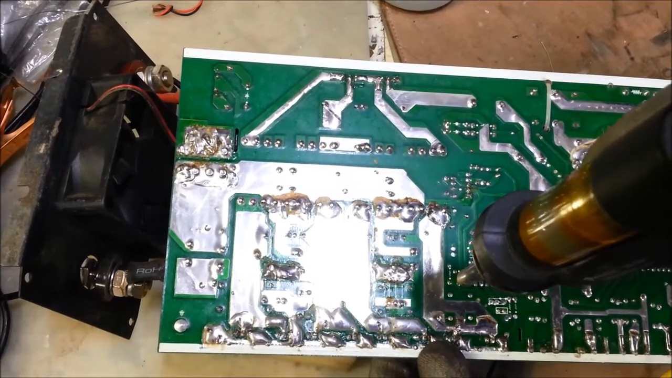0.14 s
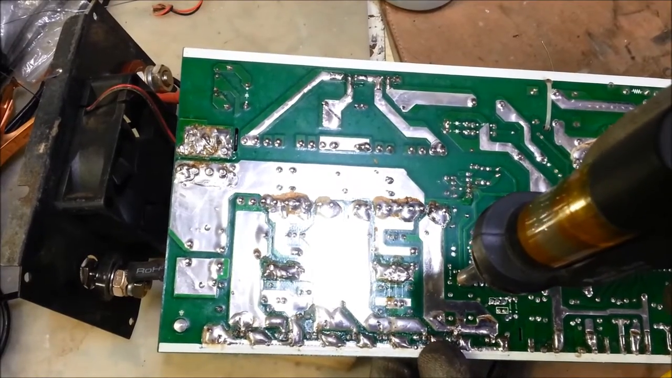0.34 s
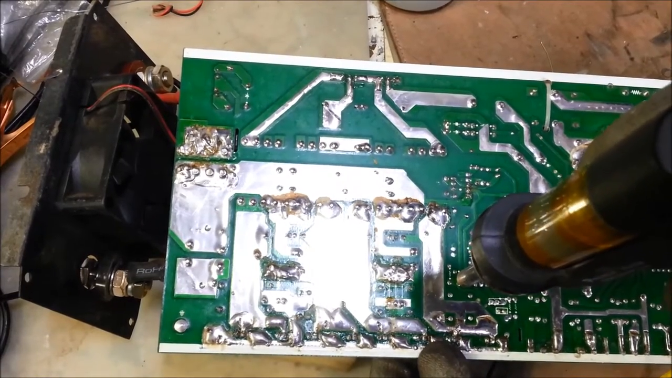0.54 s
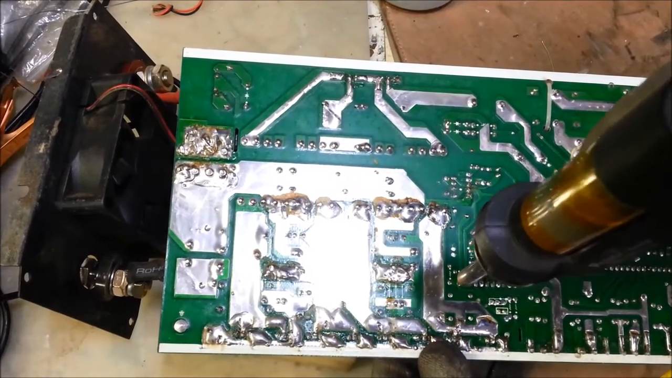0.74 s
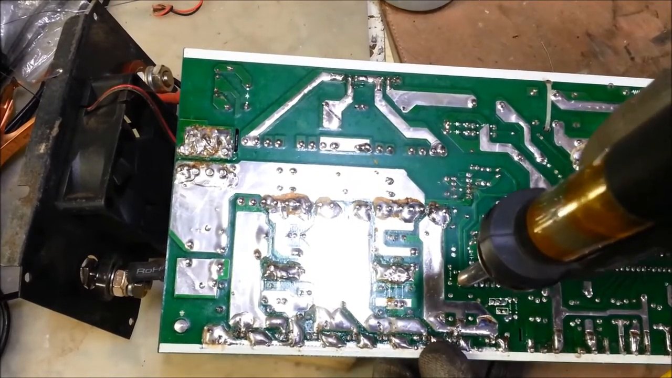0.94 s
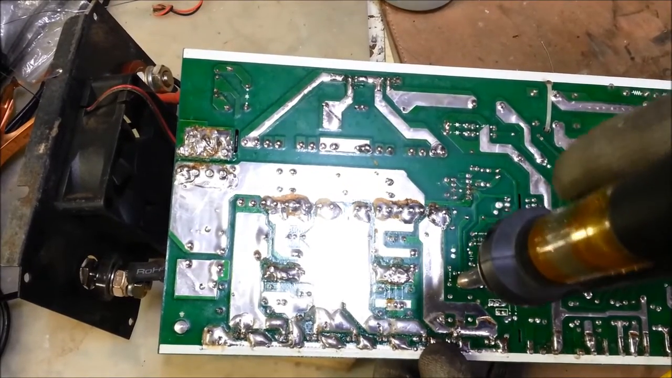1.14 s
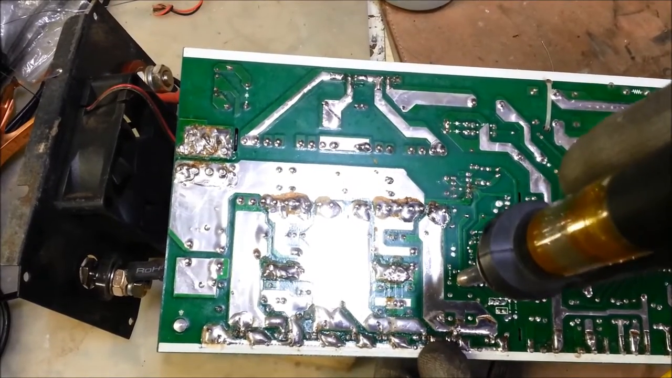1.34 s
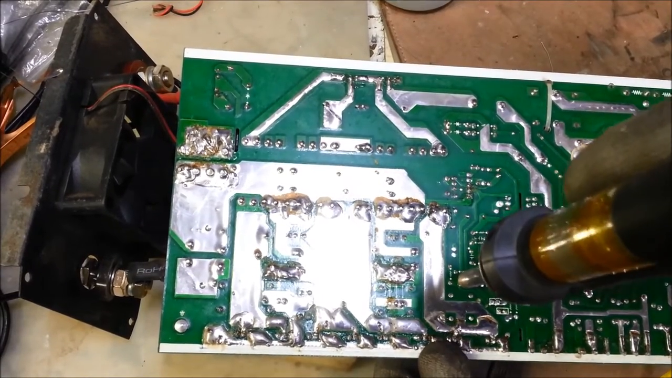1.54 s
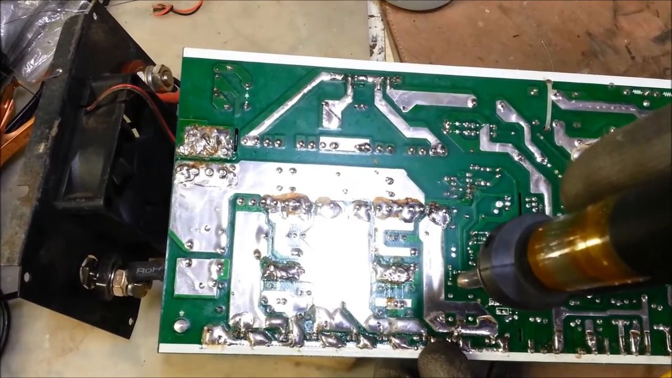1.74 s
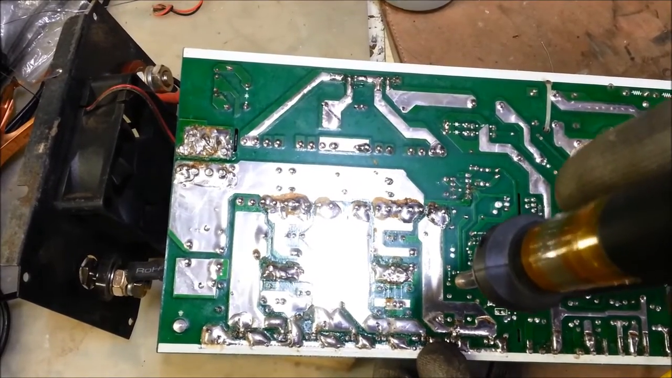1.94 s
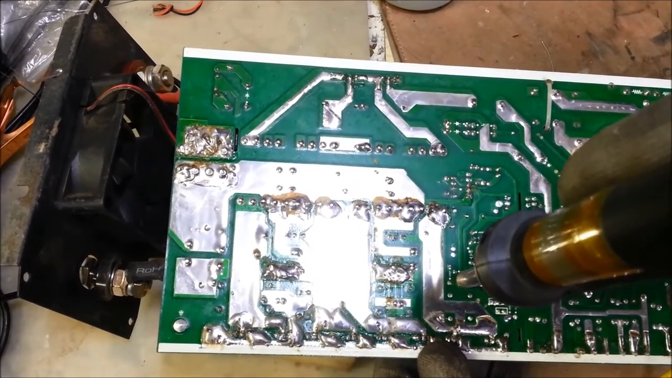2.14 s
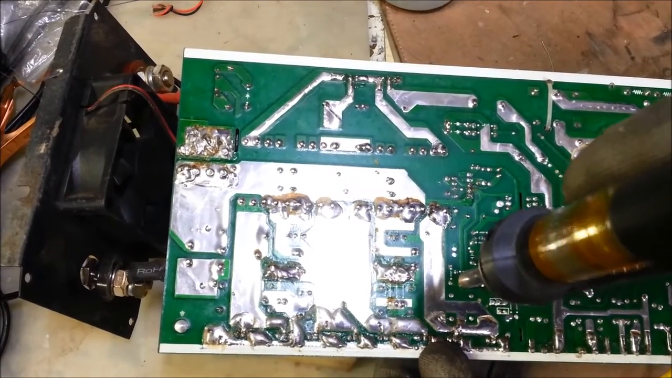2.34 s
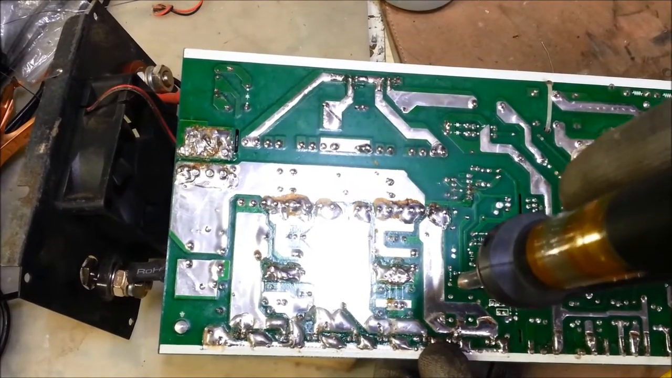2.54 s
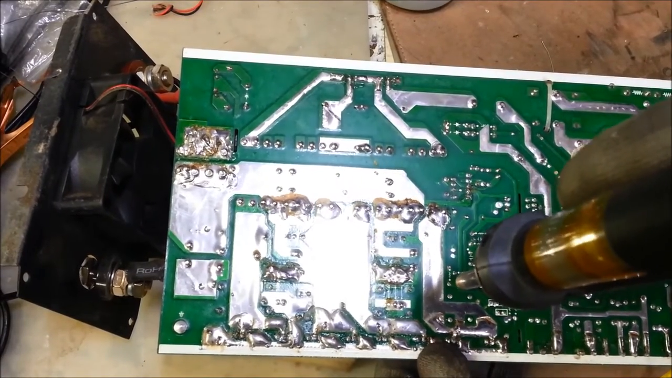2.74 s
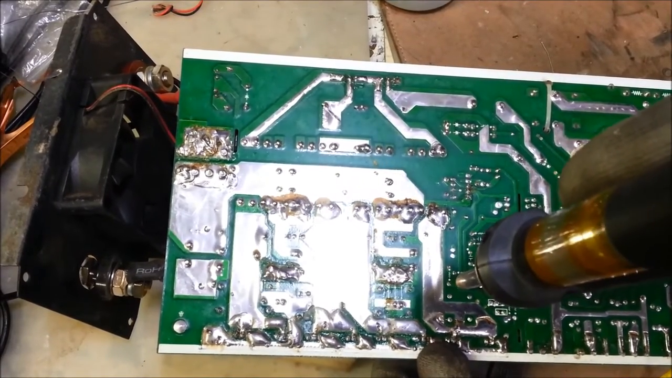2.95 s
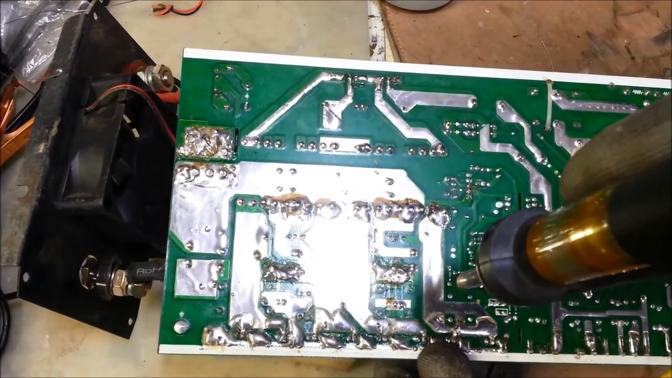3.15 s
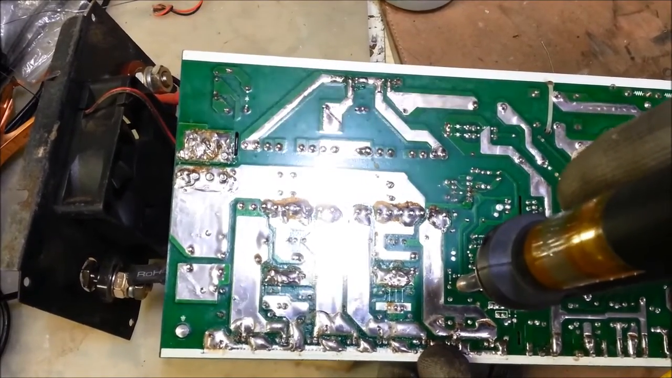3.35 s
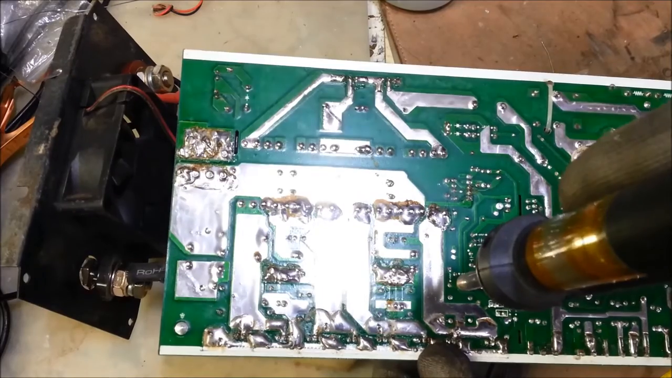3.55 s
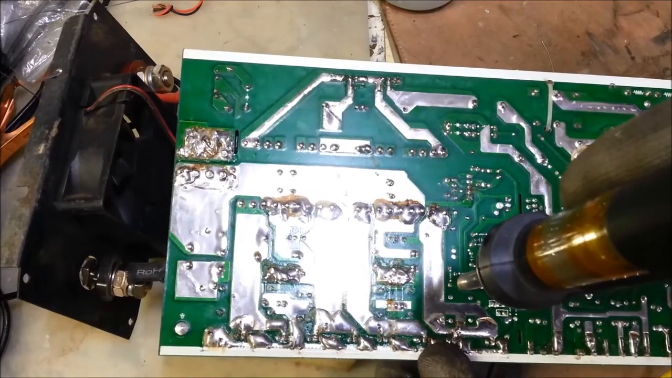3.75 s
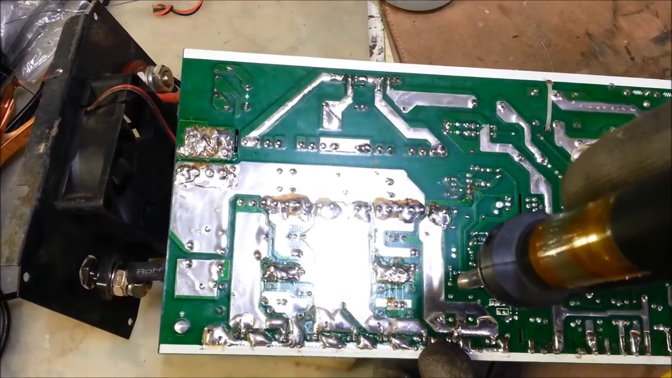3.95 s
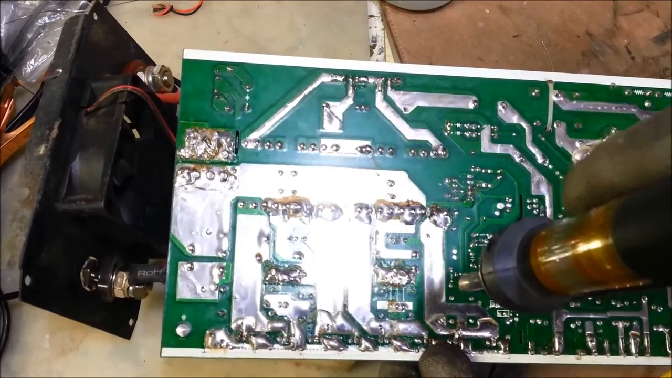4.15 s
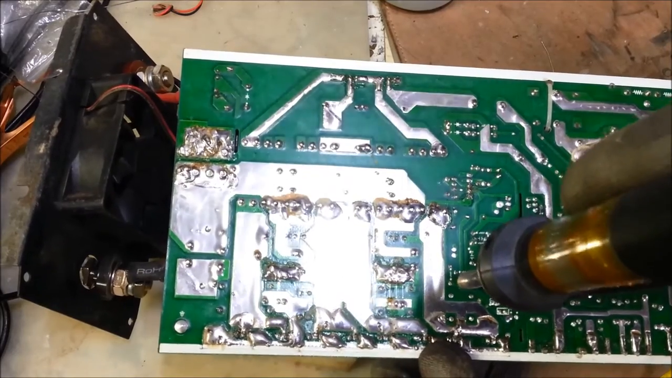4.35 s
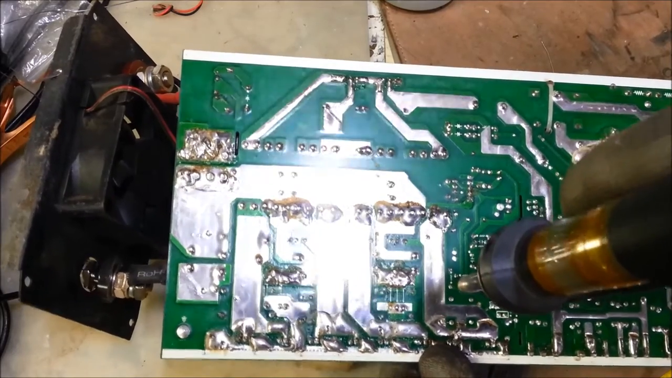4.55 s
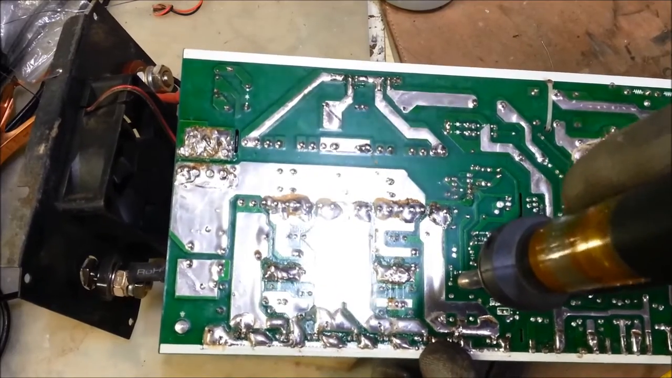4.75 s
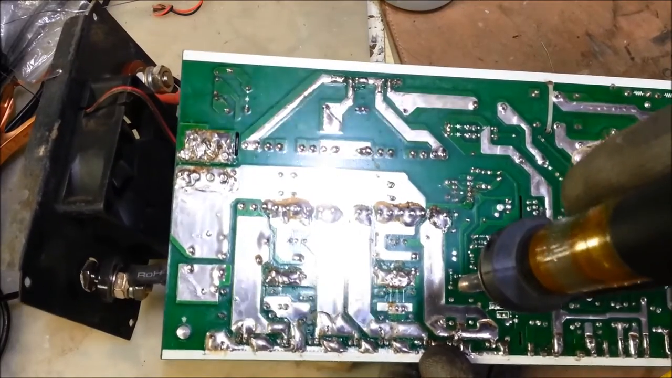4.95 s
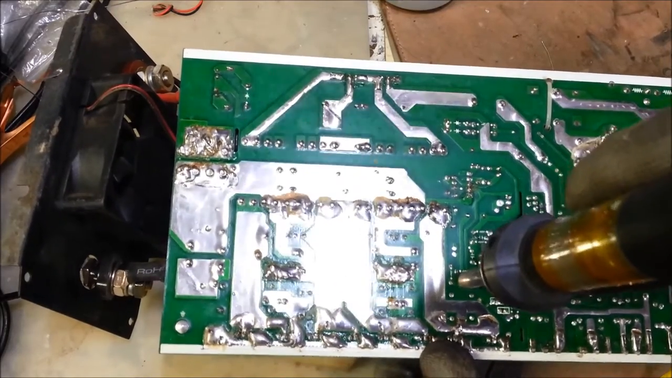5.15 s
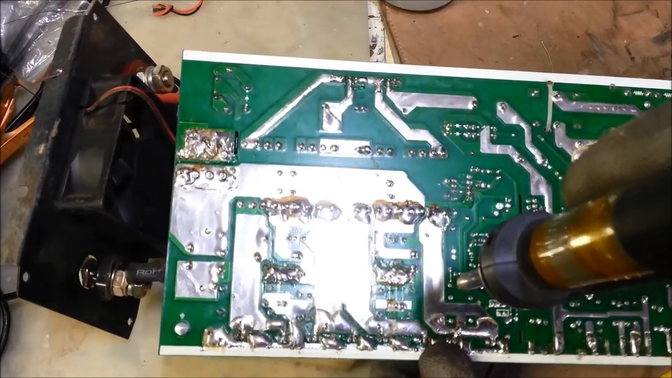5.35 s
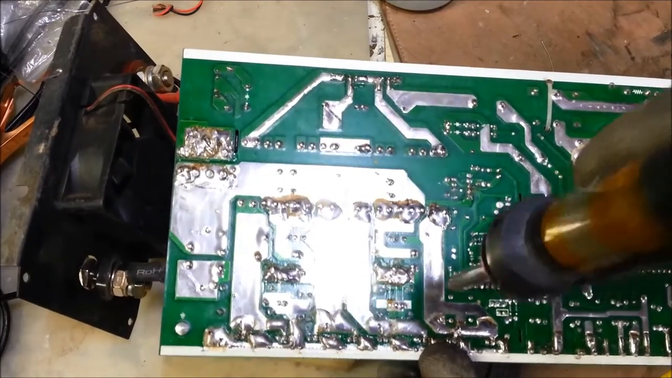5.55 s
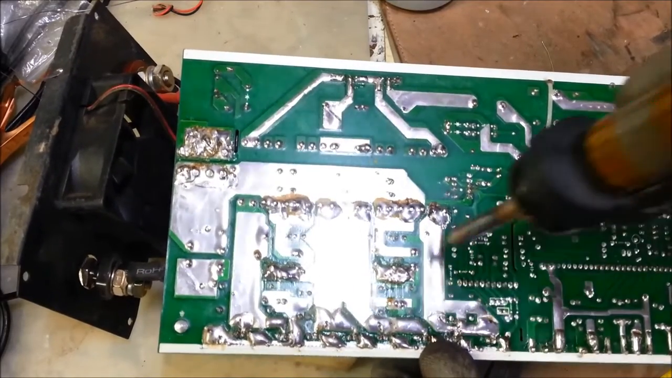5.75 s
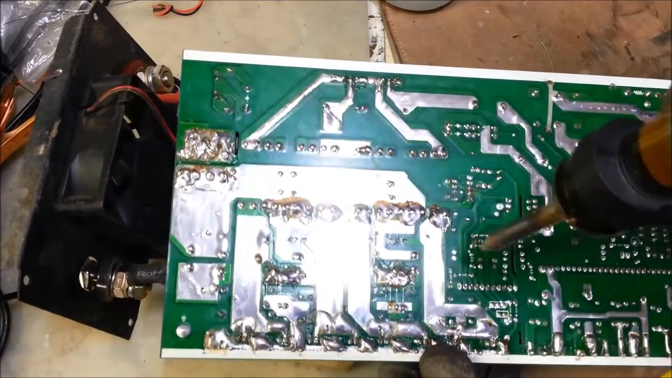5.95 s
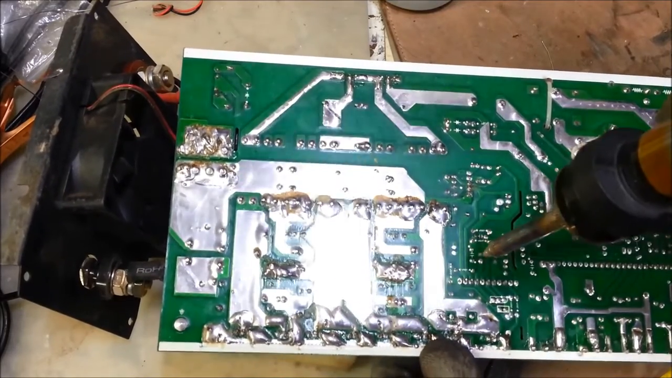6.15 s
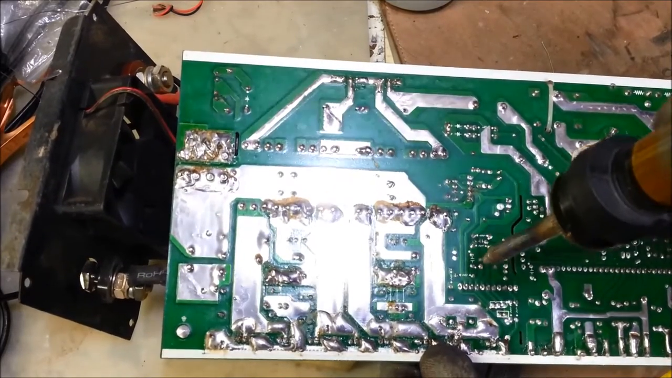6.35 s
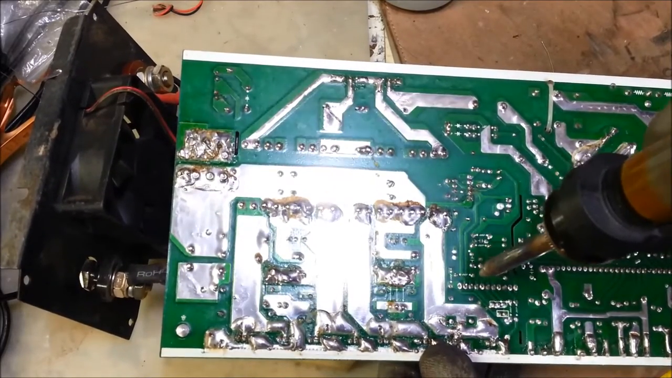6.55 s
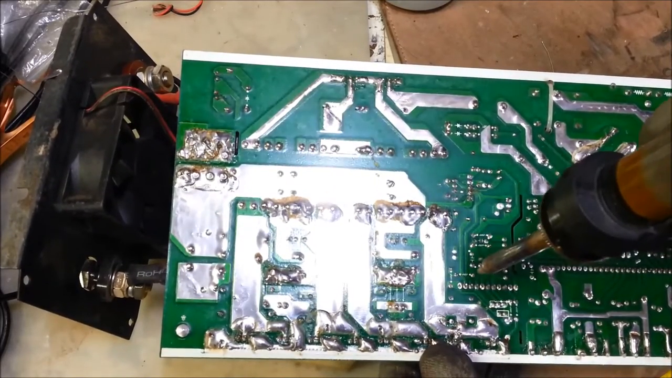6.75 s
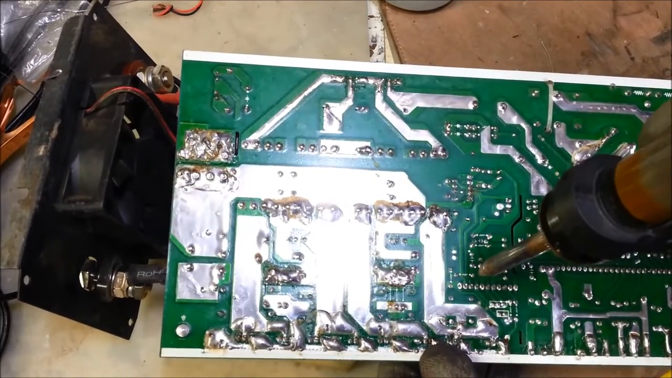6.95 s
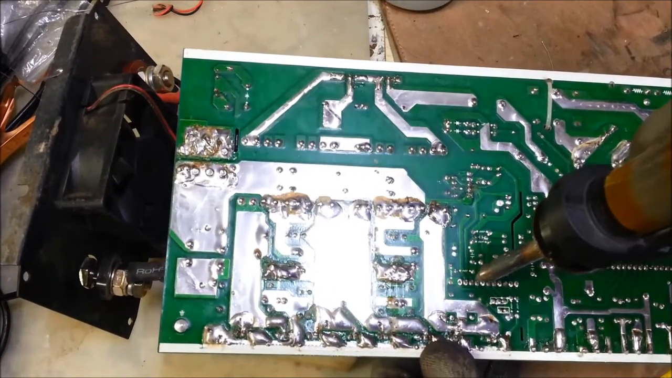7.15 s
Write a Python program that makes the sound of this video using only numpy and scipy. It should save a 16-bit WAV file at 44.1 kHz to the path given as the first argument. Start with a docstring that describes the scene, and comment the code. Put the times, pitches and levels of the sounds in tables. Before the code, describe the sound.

A small fan whines and hisses steadily on an indoor bench. A metal nozzle taps and scrapes faintly on a circuit board. Then a plastic trigger clicks and a diaphragm pump bursts into a loud, rattling low buzz for about two seconds, dragging the fan's pitch down. A sharp snap with a tiny squeak ends it; the fan climbs back. Close stereo microphone, small workshop.

```python
"""A diaphragm vacuum pump in a desoldering gun buzzes for about two seconds: each stroke rings the housing
with a thump, slap and tick, over motor whine, rattle and air hiss. A small fan whines on the same bench as
blade tones plus shaped noise; it slows while the pump runs, then recovers. Noise bursts make the nozzle's
scrapes and, at 5.294 s, a short bright hiss as solder is sucked in; its taps on a pin ring modes. The trigger
clicks, then on release squeaks (a sagging sine), snaps back and pings its spring; the pump gives a last puff."""
import sys
import numpy as np
from scipy import signal
from scipy.fft import rfft, irfft, next_fast_len
from scipy.io import wavfile

SR = 44100
rng = np.random.default_rng(int(sys.argv[2]) if len(sys.argv) > 2 else 0)


def generate_wav(signal):
    """Clip the signal to [-1, 1] and save it as 16-bit WAV at the path in sys.argv[1]."""
    frames = np.transpose(np.atleast_2d(signal))
    scaled = np.clip(frames, -1, 1) * 32767
    pcm = np.round(scaled).astype(np.int16)
    wavfile.write(sys.argv[1], SR, pcm)


N = 317705
TIME = np.arange(N) / SR

# Fan blade tones before case lift: blade_rate_multiple, left_db, right_db
FAN_TONES = [(1, -61, -61), (2, -74, -74), (3, -62, -72), (4, -65, -72), (5, -75, -63), (6, -68, -64),
             (7, -68, -64), (8, -73, -72)]
# Fan case resonances: centre_hz, width_hz, lift_db
FAN_CASE_MODES = [(1430, 170, 12.5), (1830, 15, 10), (1880, 28, -3), (1973, 40, 14), (2124, 86, -12.5),
                  (2405.7, 42, 17.5), (2750, 35, -9), (2910, 72, 7)]
# Extra level of the sixth fan tone: time_s, gain_db
SIXTH_TONE_GAIN = [(0, -1), (.95, 1), (1.45, 2), (2.2, 2), (2.8, 1.5), (3.5, 2.5), (7, 5)]
# Relative spectra of fan noise, lower and upper part: freq_hz, density_db
FAN_RUSH = [(25, -5), (70, -41), (120, -27), (190, -24.5), (230, -10), (265, -12.5), (340, -0.5),
            (395, 1.5), (450, -3), (520, -1.5), (620, -8), (780, -6.5), (1050, -2), (1400, -5.5),
            (1900, -7.5), (2700, -11)]
FAN_HISS = [(2000, -39), (3000, 1), (4000, 1.5), (5500, -2), (7500, -4.5), (10000, -6), (14500, -8.5)]
# Slow level change of the draught: time_s, gain_db
DRAUGHT_GAIN = [(0, 2.1), (.9, 0), (2.5, -0.1), (3.4, -1), (7.2, -1.6)]
# Left-right correlation of noise: freq_hz, correlation
LIKENESS = [(60, 0.17), (200, 0.51), (400, 1), (650, 0.66), (1000, 0.56), (1600, 0.072), (2500, 0.072),
            (4000, 0.14), (8000, 0.041), (14000, 0.12)]
# Nozzle scrapes, and at 5.294 s a short bright hiss as solder is sucked in:
# start_s, level_db, length_s, brightest_hz, knock_re_burst_db, broad_re_peak_db
NOZZLE_BURSTS = [(0.597, -49, 0.038, 5700, -13, 7), (1.8765, -44.5, 0.005, 3150, 7, 6),
                 (2.001, -47.5, 0.0087, 3600, -8, 13), (2.076, -47, 0.01, 6270, -15, 9),
                 (2.127, -35.5, 0.013, 5700, -6, 12), (2.265, -52, 0.0047, 4000, 13, 4),
                 (2.336, -37, 0.0086, 8700, -20, -4), (2.383, -33.5, 0.011, 5400, -6.5, 15),
                 (2.413, -41.5, 0.0074, 4200, 1.5, 17), (2.649, -47, 0.008, 4600, -8, 8),
                 (2.735, -46.5, 0.007, 4840, 4.5, 6), (2.774, -46.5, 0.01, 4930, 1, 8),
                 (2.853, -44, 0.019, 6360, -25, 16), (4.286, -28, 0.0039, 6340, -12, -2),
                 (5.294, -43, 0.044, 11900, -20, -8), (6.449, -45, 0.0059, 5900, -8, 4)]
# Circuit board modes: freq_hz, t60_s
BOARD_MODES = [(980, 0.014), (1420, 0.011), (1800, 0.0091), (2350, 0.0056)]
# Nozzle landings on a pin: start_s, level_db
TAPS = [(1.2318, -34), (1.2526, -25)]
# Nozzle and pin modes: freq_hz, level_db, t60_s
PIN_MODES = [(2300, -8, .006), (4340, -6, 0.0068), (5030, 0, 0.01), (6200, -7, 0.011), (8360, -4, 0.0022),
             (11100, -7, .002)]
# Trigger contacts: start_s, level_db, pan_db, colour_hz (modes near it ring most)
TRIGGER_CONTACTS = [(3.825, -15, -6, 4870), (3.8255, -13, 1, 6000), (5.6873, -9.5, -6, 7640),
                    (5.6883, -9, -1, 6500)]
# Trigger modes: freq_hz, level_db, t60_s
TRIGGER_MODES = [(1400, -14, .015), (2400, -7, .012), (3150, -13, .012), (4550, -8, .007), (5050, -5, .009),
                 (6050, -9, .008), (7250, -6, .011), (8000, -10, .009), (11800, -13, .008)]
# Relative response of the pump housing: full_speed_multiple, left_db, right_db
HOUSING = [(1, -84, -84), (2, -43, -42), (3, -41, -39), (4, -29, -27), (5, -46, -45), (6, -42, -47),
           (7, -48, -52), (8, -59, -56), (9, -50, -45), (10, -42, -45), (11, -28, -45), (12, -36, -37),
           (13, -35, -42), (14, -41, -43), (15, -45, -54), (16, -49, -53), (17, -50, -44), (18, -48, -42),
           (19, -40, -46), (20, -49, -42), (21, -43, -42), (22, -43, -39), (23, -44, -43), (24, -41, -39),
           (25, -42, -39), (26, -34.5, -35.5), (27, -46, -48), (28, -48, -48), (29, -55, -53),
           (30, -48, -47), (31, -55, -53), (32, -56, -52), (33, -56, -53), (34, -53, -53), (35, -56, -49),
           (36, -55, -54), (37, -48, -45), (38, -47, -44), (39, -53, -60), (40, -61, -58)]
# Motor whine from commutator and gears: stroke_rate_multiple, left_db, right_db
WHINE_TONES = [(16, -35.5, -44), (17, -51, -43), (21, -48, -48), (30, -48, -48), (37, -49, -46),
               (42, -54, -58)]
# Relative spectra of housing rattle and rushing air: freq_hz, density_db
RATTLE_SPECTRUM = [(35, -59), (90, -21.5), (170, -12.5), (255, -22), (315, -1.5), (390, -2.5), (520, -7),
                   (730, -9.5), (970, 2.5), (1250, -7.5), (1750, -4.5), (2250, -5), (2900, -13),
                   (4000, -19.5)]
AIR_SPECTRUM = [(2200, 0), (3300, 0), (4000, -3), (5200, 0.5), (5900, -1), (8700, -2), (10500, -9),
                (12500, -13), (14200, -17)]
# Stroke rate allowed by the suction load: time_s, strokes_hz
LOADED_SPEED = [(4.2, 88.3), (4.45, 88.8), (4.626, 88.6), (4.718, 89.4), (4.98, 88.5), (5.014, 87.9),
                (5.102, 87.5), (5.16, 88.1), (5.536, 88.2), (5.654, 87.8), (5.7, 87.0)]
# Stroke gains varying with the suction load: time_s, slap_db, tick_db
STROKE_GAINS = [(3.88, -9, -6.5), (4.04, 4, 0.5), (4.2, -1, -2), (4.55, -1.4, 1), (4.76, 0.5, 2.5),
                (5.06, 1.2, -0.5), (5.5, 0.4, 0.5), (5.7, 1.6, -0.8)]
# Envelopes of pump parts: running_db, labour_db, growth_db_per_s, swell_db, fall_db_per_s
THUMP_ENV = (-27.5, 1, 0.13, 44, 162)
SLAP_ENV = (-34, 3.5, 1, 5, 109)
TICK_ENV = (-34.5, 1, -0.07, 13, 114)
RATTLE_ENV = (-38.5, 6, 1.8, 6.5, 115)
AIR_ENV = (-37, 2, 1.1, 4.5, 141)
# Pump case panel modes: freq_hz, level_db, t60_s
PANEL_MODES = [(462, -3, .05), (927, 4, 0.17), (1034, 0, 0.14)]

EAR_LAG_S = 0.0003776   # pump and fan stand to the right, so the left microphone lags
FAN_FREE_HZ, FAN_DRAGGED_HZ, FAN_INERTIA_S = 396.9, 333, .46
HUNT_HZ, HUNT_PERIOD_S, HUNT_TOP_S = 0.99, 1.22, 0.99   # slow wander of the blade rate
# Noise levels at free fan speed; powers of speed that the amplitudes follow
RUSH_DB, RUSH_POWER, HISS_DB, HISS_POWER = -45.5, 3.6, -52.5, 3.2
# The trigger switches the motor; it starts at a share of its speed, and brakes evenly at the end
PUMP_ON_S, PUMP_OFF_S, FULL_SPEED_HZ = 3.83, 5.70, 88.4
KICK_SHARE, SPIN_UP_S, BRAKE_HZ_PER_S, COAST_S = .56, .083, 450, .105
ATTACK_S = .055
LABOUR_S, SETTLE_S = 0.24, 0.023   # the pump labours until the vacuum has built up, then settles
PANEL_DB, PANEL_START_S, PANEL_END_S = -33.5, 3.84, 4.15
SNAP_S, SLIDE_S, SQUEAK_HZ, SQUEAK_SAG_HZ_PER_S = 5.688, 0.019, 7130, 190000
SLIDE_DB, GRIP_DB, GRIP_S, SQUEAK_DECAY_S = -24, -11.5, 0.0019, 0.005
CUTOFF_HZ = 14800


def from_db(db):
    """Decibels to gain."""
    return 10 ** (np.asarray(db) / 20)


def rms_one(x):
    """Scale to rms 1."""
    return x / np.sqrt(np.mean(x ** 2) + 1e-20)


def since(start_s):
    """Seconds since a moment; zero before it."""
    return np.maximum(TIME - start_s, 0)


def in_time(rows):
    """Interpolate each curve column at every sample."""
    time_s, *columns = np.transpose(rows)
    return [np.interp(TIME, time_s, column) for column in columns]


def at_hz(points, hz):
    """Read a spectrum on a log-frequency axis."""
    freq_hz, values = np.transpose(points)
    return np.interp(np.log(hz), np.log(freq_hz), values)


def panned(pan_db):
    """Left and right gains; positive is left."""
    return from_db(np.array([[pan_db], [-pan_db]]) / 2)


def drift(rate_hz):
    """Random wander of rms 1, with two knots per cycle of the rate."""
    knots = rng.standard_normal(int(2 * rate_hz * N / SR) + 2)
    return rms_one(np.interp(TIME * 2 * rate_hz, np.arange(len(knots)), knots))


def bandpass(x, order, low_hz, high_hz):
    """Butterworth band-pass."""
    band_hz = [low_hz, min(high_hz, .45 * SR)]
    return signal.sosfilt(signal.butter(order, band_hz, "band", fs=SR, output="sos"), x)


def ring(x, hz, t60_s):
    """Two-pole resonator: a unit click starts a decaying sine of height 1."""
    radius = from_db(-60 / (t60_s * SR))
    angle = 2 * np.pi * hz / SR
    feedback = [1, -2 * radius * np.cos(angle), radius ** 2]
    return signal.lfilter([0, np.sin(angle)], feedback, x + 1e-18)


def ring_modes(x, modes):
    """Sum of resonators with alternating sign."""
    return sum(from_db(db) * ring(x, hz, t60_s) * (-1) ** k for k, (hz, db, t60_s) in enumerate(modes))


def lagged(hz):
    """Left-right arrival phase; the lag is shorter in the bass."""
    lag_s = EAR_LAG_S * np.clip(hz / 1400, .65, 1) * np.array([[1], [0]])
    return np.exp(-2j * np.pi * hz * lag_s)


def stereo_noise(spectrum):
    """Shaped noise with frequency-dependent stereo correlation, rolled off beyond its ends."""
    size = next_fast_len(N)
    hz = np.maximum(np.fft.rfftfreq(size, 1 / SR), 1)
    gain = from_db(at_hz(spectrum, hz))
    gain = gain / (1 + (spectrum[0][0] / hz) ** 4)
    gain = gain / (1 + (hz / spectrum[-1][0] / 1.2) ** 8)
    alike = np.clip(at_hz(LIKENESS, hz), -1, 1)
    mid, side = rfft(rng.standard_normal((2, size)))
    pair = np.sqrt(1 + alike) * mid + np.sqrt(1 - alike) * side * [[1], [-1]]
    return rms_one(irfft(gain * lagged(hz) * pair, size)[:, :N])


def room(x, t60_s, wet_db, dull_hz):
    """Diffuse small-workshop tail, different at each ear."""
    t = TIME[:SR // 2]
    tail = rng.standard_normal((2, len(t))) * from_db(-60 * t / t60_s) * (t > .004)
    tail = tail / np.sqrt(np.sum(tail[0] ** 2))
    lowpass = signal.butter(1, min(dull_hz, .45 * SR), fs=SR, output="sos")
    tail = signal.sosfilt(lowpass, tail)
    return x + from_db(wet_db) * signal.fftconvolve(x, tail, axes=1)[:, :N]


def fan_speed():
    """Blade passes per second: pump drag and recovery share one inertia."""
    drag = np.exp(-since(PUMP_OFF_S) / FAN_INERTIA_S) - np.exp(-since(PUMP_ON_S) / FAN_INERTIA_S)
    return FAN_FREE_HZ + (FAN_DRAGGED_HZ - FAN_FREE_HZ) * drag


def fan(waver_db, gust_db):
    """Blade tones, lifted by case resonances, over unsteady draught noise."""
    hunt = np.cos(2 * np.pi * (TIME - HUNT_TOP_S) / HUNT_PERIOD_S)
    blades_hz = fan_speed() + HUNT_HZ * hunt
    pace = blades_hz / FAN_FREE_HZ
    phase = 2 * np.pi * np.cumsum(blades_hz * (1 + 0.00062 * drift(15))) / SR
    heard_phase = phase - 2 * np.pi * blades_hz * EAR_LAG_S * [[1], [0]]
    out = from_db(RUSH_DB + gust_db * drift(14)) * pace ** RUSH_POWER * stereo_noise(FAN_RUSH)
    out += from_db(HISS_DB) * pace ** HISS_POWER * stereo_noise(FAN_HISS)
    out *= from_db(in_time(DRAUGHT_GAIN))
    sixth_db, = in_time(SIXTH_TONE_GAIN)
    for k, left_db, right_db in FAN_TONES:
        tone_db = waver_db * drift(7) + (k == 6) * sixth_db
        for hz, width_hz, lift_db in FAN_CASE_MODES:
            tone_db = tone_db + lift_db / (1 + ((k * blades_hz - hz) / width_hz) ** 2)
        gain = from_db(tone_db) * from_db([[left_db], [right_db]])
        out += gain * np.sqrt(2) * np.sin(k * heard_phase)
    return out


def nozzle_bursts(grain_db, attack_s, release_s):
    """Nozzle scrapes, and at 5.294 s a bright hiss of sucked-in solder: grainy noise plus board modes."""
    out = np.zeros((2, N))
    t = TIME[:SR // 6]
    for start_s, level_db, length_s, hz, knock_db, broad_db in NOZZLE_BURSTS:
        grain_levels = np.repeat(rng.uniform(-1.2, 1, len(t)), 20)[:len(t)]   # held for 20 samples
        grains = rng.standard_normal((2, len(t))) * from_db(grain_db * grain_levels)
        peak = bandpass(grains, 2, hz / 1.184, hz * 1.11)
        broad = bandpass(grains, 1, hz / 4, hz * 1.5)
        burst = rms_one(rms_one(peak) + from_db(broad_db) * rms_one(broad))
        knock = rms_one(ring_modes(grains, [(mode_hz, 0, t60_s) for mode_hz, t60_s in BOARD_MODES]))
        envelope = np.minimum(t / attack_s, 1) * np.exp(-np.maximum(t - length_s, 0) / release_s)
        start = int(start_s * SR)
        out[:, start:start + len(t)] += from_db(level_db) * envelope * (burst + from_db(knock_db) * knock)
    return out


def taps():
    """Nozzle lands on a pin: clicks excite short ringing modes."""
    start_s, level_db = np.transpose(TAPS)
    clicks = np.bincount((start_s * SR).astype(int), from_db(level_db), N)
    return ring_modes(clicks, PIN_MODES)


def trigger(crack_s, crack_db, squeak_pan_db):
    """Plastic trigger snaps in and out: noise crack plus modes; squeak and spring on release."""
    out = np.zeros((2, N))
    t = TIME[:SR // 10]
    for start_s, level_db, pan_db, colour_hz in TRIGGER_CONTACTS:
        crack = from_db(crack_db) * rng.standard_normal((2, len(t))) * np.exp(-t / crack_s)
        hit = bandpass(crack, 2, colour_hz / 3.3, colour_hz * 1.63)   # a small part radiates no bass
        for hz, mode_db, t60_s in TRIGGER_MODES:
            fade_db = -60 * t / t60_s
            off_colour_db = min(22 * np.log2(hz / colour_hz) ** 2, 9)
            tone = np.sin(2 * np.pi * (hz * t + rng.random((2, 1))))
            hit += from_db(mode_db + fade_db - off_colour_db) * tone
        start = int(start_s * SR)
        out[:, start:start + len(t)] += from_db(level_db) * panned(pan_db) * hit
    out += panned(squeak_pan_db) * squeak(rough=0.0112)
    return out + spring(level_db=-12.0, hz=3740, t60_s=0.023)


def pump_speed():
    """Strokes per second: spin-up to the loaded speed, even braking after switch-off."""
    loaded_hz, = in_time(LOADED_SPEED)
    spin_up = 1 - (1 - KICK_SHARE) * np.exp(-since(PUMP_ON_S) / SPIN_UP_S)
    return np.maximum(loaded_hz * spin_up - BRAKE_HZ_PER_S * since(PUMP_OFF_S), 0)


def pump_gain(running_db, labour_db, growth_db_per_s, swell_db, fall_db_per_s):
    """Envelope of one pump part: attack, labouring, slow drift in level, release."""
    age_s = since(PUMP_ON_S)
    attack_db = swell_db * np.minimum(age_s / ATTACK_S - 1, 0)
    labouring = (1 - np.tanh((age_s - LABOUR_S) / SETTLE_S / 2)) / 2
    held_db = running_db + labour_db * labouring + growth_db_per_s * age_s
    return from_db(held_db + attack_db - fall_db_per_s * since(PUMP_OFF_S))


def strokes(turns, lag_turns, jitter_s, uneven_db):
    """One slightly uneven pulse per crank turn, split between two samples."""
    chance = rng.standard_normal((int(turns[-1]), 2))
    at_s = np.interp(np.arange(len(chance)) + lag_turns, turns, TIME) + jitter_s * chance[:, 0]
    at = np.clip(at_s * SR, 0, N - 2)
    whole = at.astype(int)
    part = at - whole
    size = from_db(uneven_db * chance[:, 1])
    return np.bincount(whole, size * (1 - part), N) + np.bincount(whole + 1, size * part, N)


def housing(pulses, rows):
    """Part of the housing response: minimum phase, so ringing follows the blow."""
    size = 2 * next_fast_len(N // 2 + 1)
    multiple, *sides_db = np.transpose(rows)
    hz = np.fft.rfftfreq(size, 1 / SR)
    axis = hz / FULL_SPEED_HZ
    beyond = np.abs(axis - np.clip(axis, multiple[0], multiple[-1]))
    edge_db = np.minimum(14 * beyond ** 2, 30)
    gain = from_db([np.interp(axis, multiple, side_db) - edge_db for side_db in sides_db])
    gain = gain / (1 + (beyond / 6) ** 2)
    cepstrum = irfft(np.log(gain.mean(axis=0)), size)
    phase = 2 * rfft(cepstrum[:size // 2], size).imag
    out = irfft(gain * np.exp(1j * phase) * lagged(hz) * rfft(pulses, size), size)[:, :N]
    steady = (TIME > 4.2) & (TIME < 5.6)
    return out / np.std(out[:, steady].mean(axis=0))


def case_echo(x, delay_s, share):
    """Bounces inside the case: an allpass spreads each pulse."""
    gap = np.zeros(int(delay_s * SR))
    share = np.clip(share, 0, .9)
    return signal.lfilter(np.r_[-share, gap, 1], np.r_[1, gap, -share], x)


def motor_whine(turns, speed_hz):
    """Wavering commutator and gear tones locked to the crank, faint below full speed."""
    heard_turns = turns - speed_hz * EAR_LAG_S * [[1], [0]]
    out = np.zeros((2, N))
    for k, left_db, right_db in WHINE_TONES:
        gain = from_db([[left_db], [right_db]]) * from_db(3.1 * drift(2))
        out += gain * np.sqrt(2) * np.sin(2 * np.pi * k * heard_turns)
    return out * np.minimum(speed_hz / FULL_SPEED_HZ, 1) ** 16


def panel(turns, pan_db, fade_s):
    """Uneven strokes ring a case panel while the motor runs up."""
    blows = strokes(turns, lag_turns=.4, jitter_s=.00005, uneven_db=1.5)
    shaking = np.clip(since(PANEL_START_S) / 0.017, 0, 1) * np.clip((PANEL_END_S - TIME) / fade_s, 0, 1)
    sound = shaking * ring_modes(blows, PANEL_MODES)
    return from_db(PANEL_DB) * panned(pan_db) * sound / np.std(sound[shaking > 0])


def pump():
    """Each turn: diaphragm thump, valve slap, crank tick; plus whine, panel, rattle and air."""
    speed_hz = pump_speed()
    running = np.clip(since(PUMP_ON_S) / .01, 0, 1)
    running = running * np.clip((PUMP_OFF_S + COAST_S - TIME) / .04, 0, 1)
    turns = np.cumsum(speed_hz * (running > 0) * (1 + .0008 * drift(10))) / SR
    low, middle, high = HOUSING[:7], HOUSING[7:17], HOUSING[17:]
    slap_load, tick_load = from_db(in_time(STROKE_GAINS))

    thump = housing(strokes(turns, lag_turns=.16, jitter_s=.00002, uneven_db=.4), low)
    thump = pump_gain(*THUMP_ENV) * thump
    slap = housing(strokes(turns, lag_turns=.5, jitter_s=.000009, uneven_db=.55), middle)
    slap = case_echo(slap_load * pump_gain(*SLAP_ENV) * slap, delay_s=.0022, share=0.33)
    tick = housing(strokes(turns, lag_turns=.56, jitter_s=.000005, uneven_db=.7), high)
    tick = case_echo(tick_load * pump_gain(*TICK_ENV) * tick, delay_s=.0021, share=0.49)
    buzz = thump + slap + tick + motor_whine(turns, speed_hz) + panel(turns, pan_db=3, fade_s=.11)

    # below full speed the pump shakes harder on its mounts
    shake_db = 6 * np.clip(1 - speed_hz / FULL_SPEED_HZ, 0, .25)
    rattle = pump_gain(*RATTLE_ENV) * from_db(shake_db) * stereo_noise(RATTLE_SPECTRUM)
    rattle = rattle * (1 + .45 * np.cos(2 * np.pi * (turns - .7)))
    air = pump_gain(*AIR_ENV) * stereo_noise(AIR_SPECTRUM) * panned(-2.9)
    air = air * (1 + .27 * np.cos(2 * np.pi * (turns - .55)))

    buzz = room(running * buzz, t60_s=.35, wet_db=-18, dull_hz=7000)
    return buzz + room(running * (rattle + air), t60_s=.38, wet_db=-4, dull_hz=9000)


def squeak(rough):
    """Stick-slip tone: level in the slide, loudest at the snap, sagging once the trigger grips."""
    sliding = np.clip(since(SNAP_S - SLIDE_S) / .001, 0, 1)
    slide = from_db(SLIDE_DB) * np.exp(-since(SNAP_S) / SQUEAK_DECAY_S)
    grip = from_db(GRIP_DB) * np.exp(-np.abs(TIME - SNAP_S) / GRIP_S)
    hz = np.maximum(SQUEAK_HZ - SQUEAK_SAG_HZ_PER_S * since(SNAP_S - GRIP_S), SQUEAK_HZ / 2)
    phase = 2 * np.pi * np.cumsum(hz * (1 + rough * drift(400))) / SR
    return sliding * (slide + grip) * np.sin(phase)


def spring(level_db, hz, t60_s):
    """Return spring pings at the snap: one decaying sine."""
    age_s = since(SNAP_S)
    return from_db(level_db - 60 * age_s / t60_s) * np.sin(2 * np.pi * hz * age_s)


def last_stroke(at_s, level_db, t60_s):
    """Vacuum pulls the stalled diaphragm back once: a noise puff rings three modes."""
    age_s = since(at_s)
    puff = rng.standard_normal((2, N)) * age_s / 0.0029 * np.exp(-age_s / 0.0043)
    puff = np.diff(puff, prepend=0) * SR / (2 * np.pi * 1000)   # slope: +6 dB per octave
    modes = ring(puff, 980, t60_s) - 1.6 * ring(puff, 350, t60_s) - 0.14 * ring(puff, 1900, t60_s / 2)
    return from_db(level_db) * modes


def scene():
    """Gun and board close by, pump and fan on the same bench."""
    touches = nozzle_bursts(grain_db=2.5, attack_s=0.0023, release_s=0.004) + taps()
    close = touches + last_stroke(at_s=5.831, level_db=-46, t60_s=0.029)
    close = room(close, t60_s=0.17, wet_db=-4.0, dull_hz=9050)
    clicks = trigger(crack_s=0.0047, crack_db=-4.0, squeak_pan_db=-4)
    clicks = room(clicks, t60_s=.25, wet_db=-13, dull_hz=9000)
    return fan(waver_db=0.5, gust_db=1.43) + close + clicks + pump()


def record(dry):
    """Soft-clip the peaks, then cut the top steeply."""
    lowpass = signal.ellip(10, .2, 80, CUTOFF_HZ, fs=SR, output="sos")
    return signal.sosfilt(lowpass, np.tanh(dry))


dry = scene()
out = record(dry)
generate_wav(out)
```